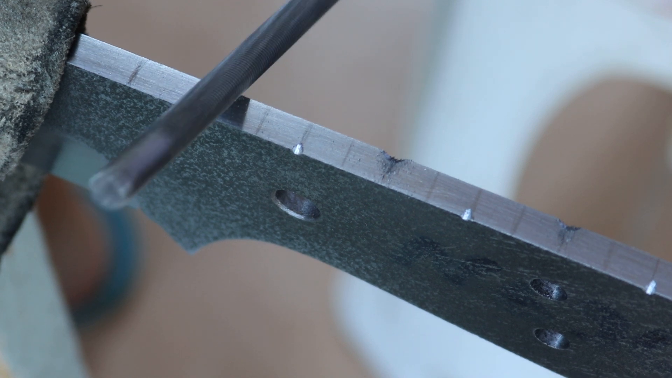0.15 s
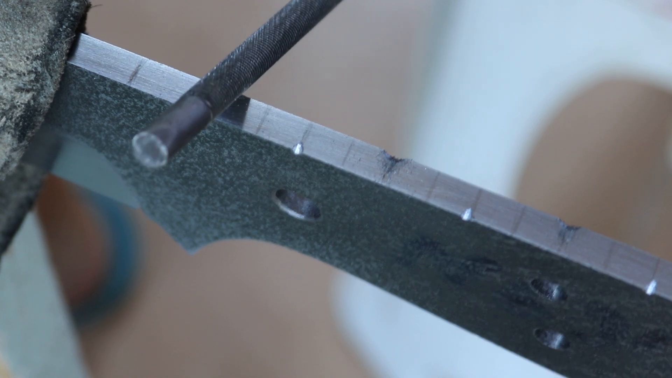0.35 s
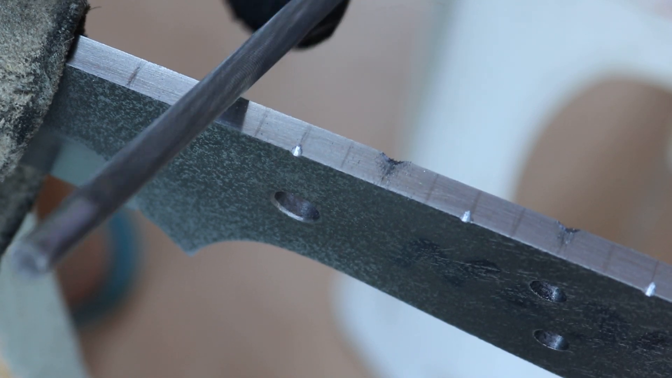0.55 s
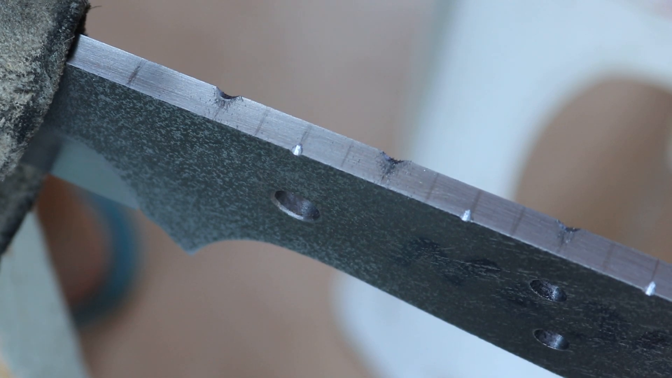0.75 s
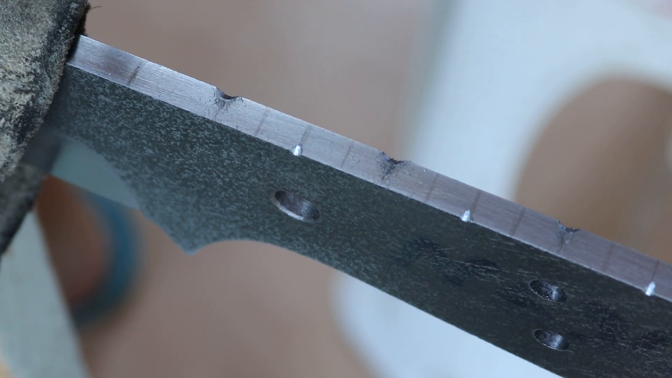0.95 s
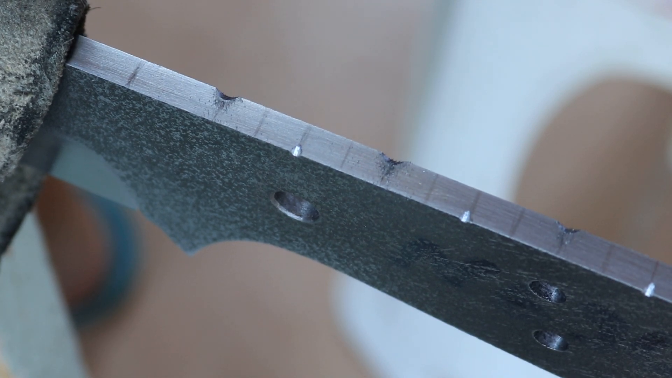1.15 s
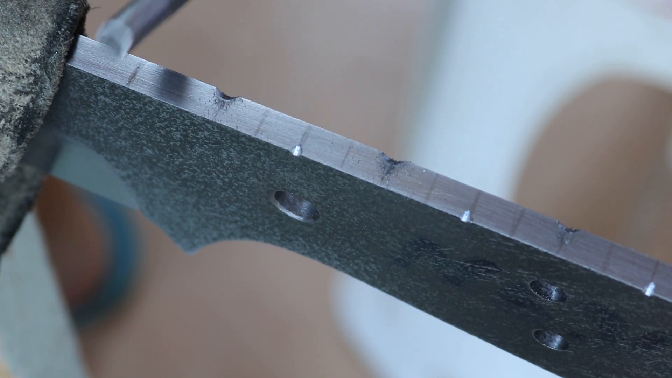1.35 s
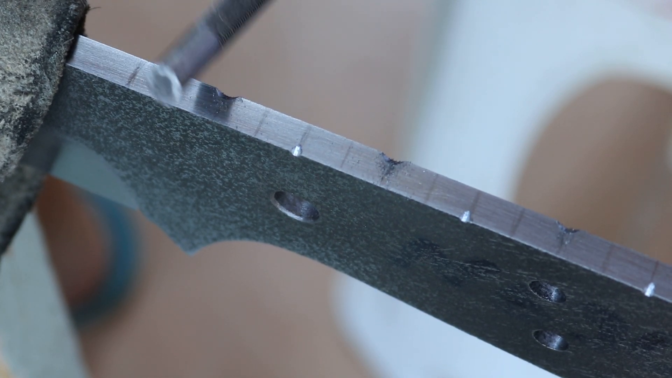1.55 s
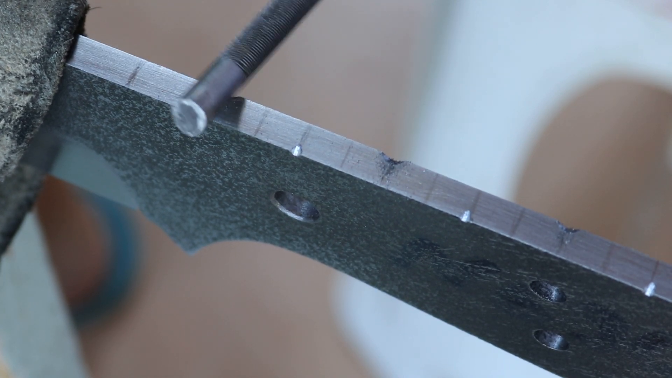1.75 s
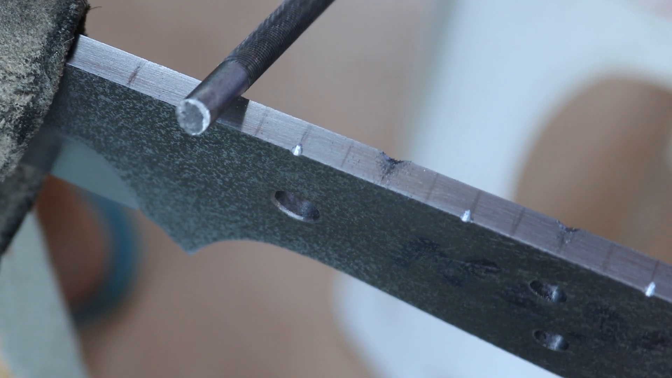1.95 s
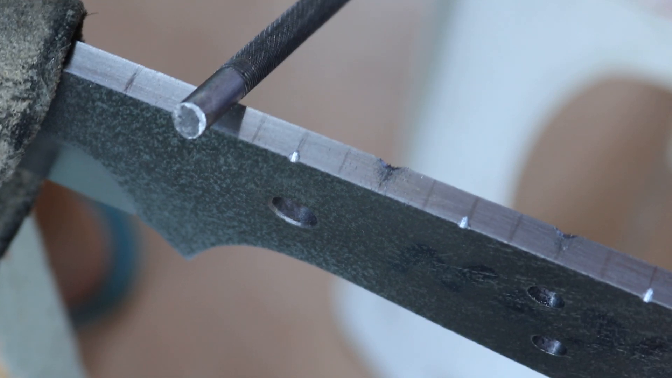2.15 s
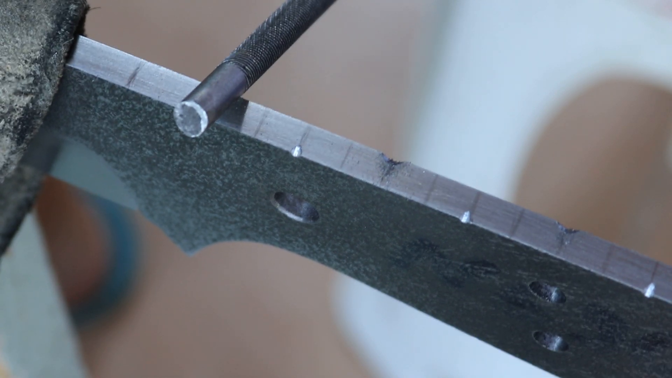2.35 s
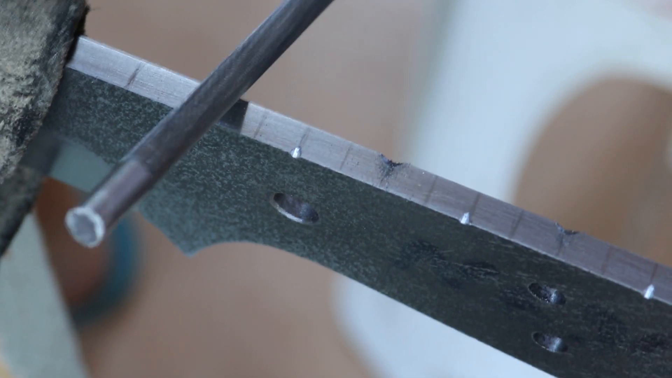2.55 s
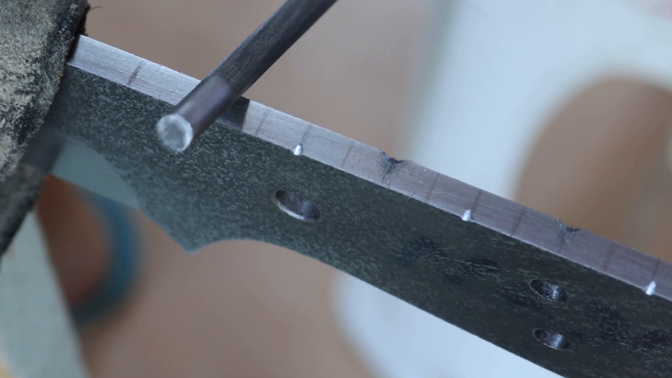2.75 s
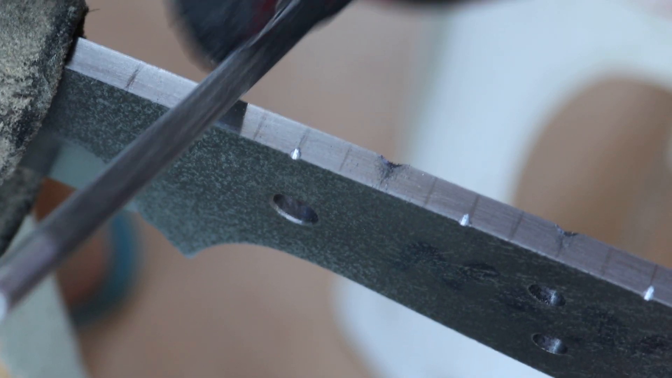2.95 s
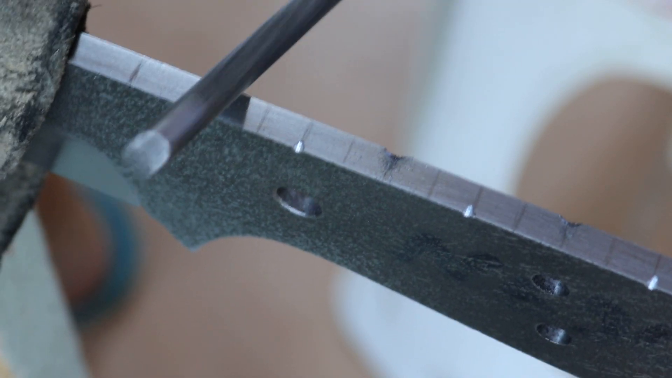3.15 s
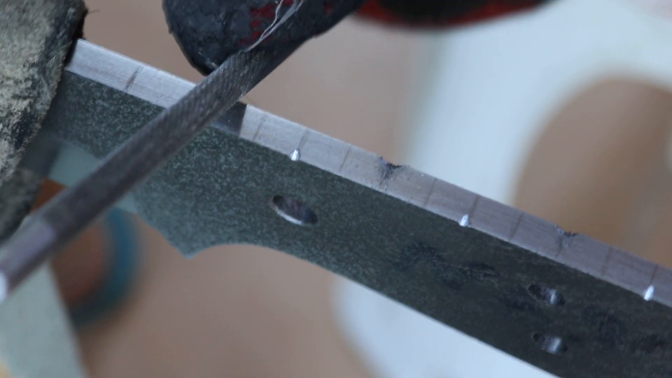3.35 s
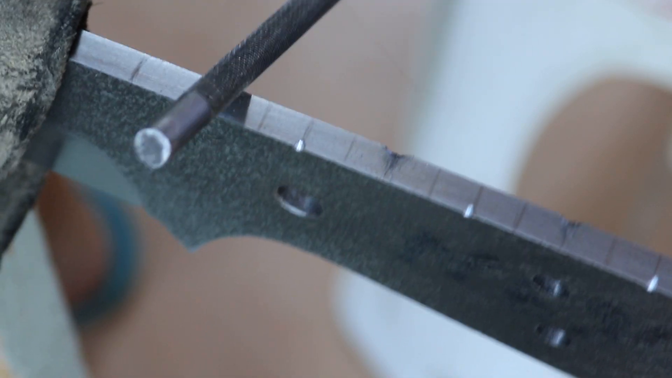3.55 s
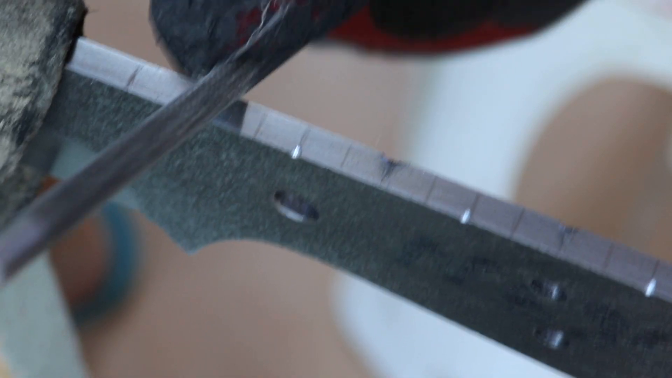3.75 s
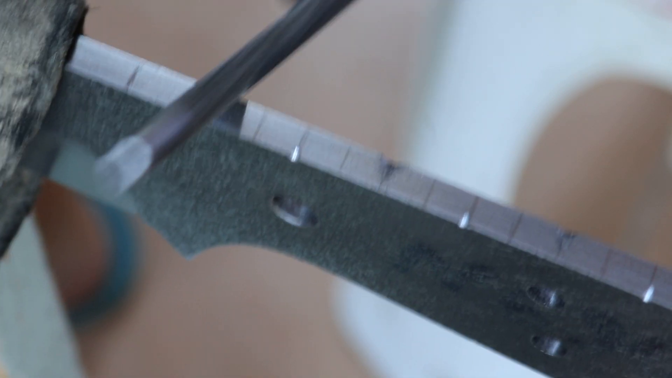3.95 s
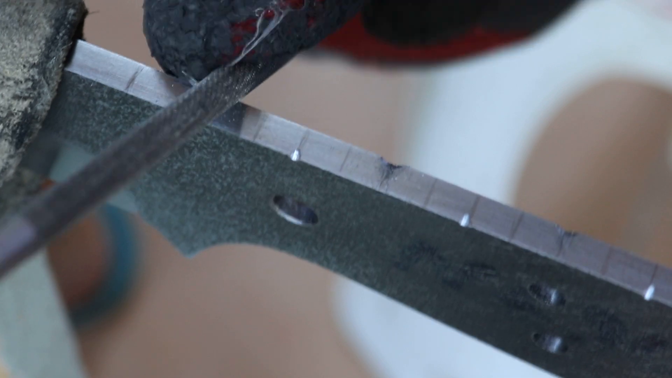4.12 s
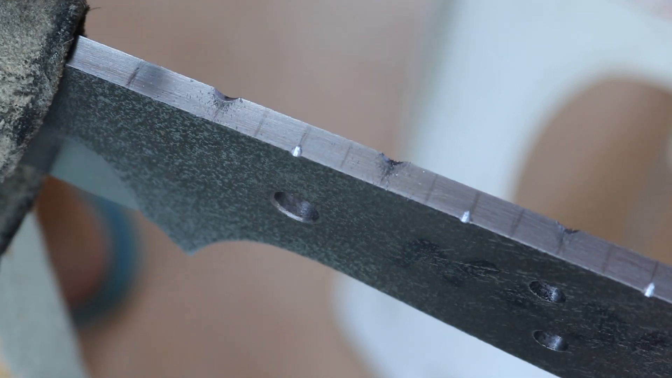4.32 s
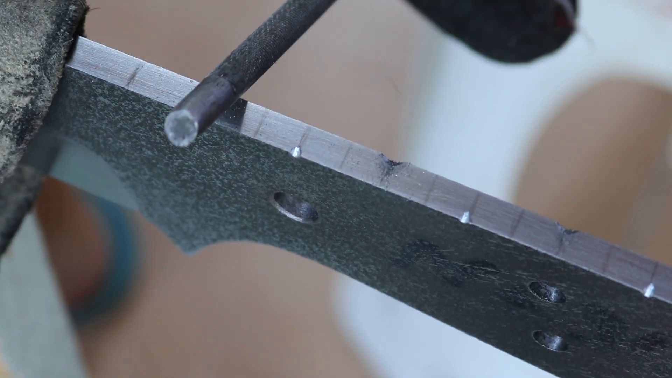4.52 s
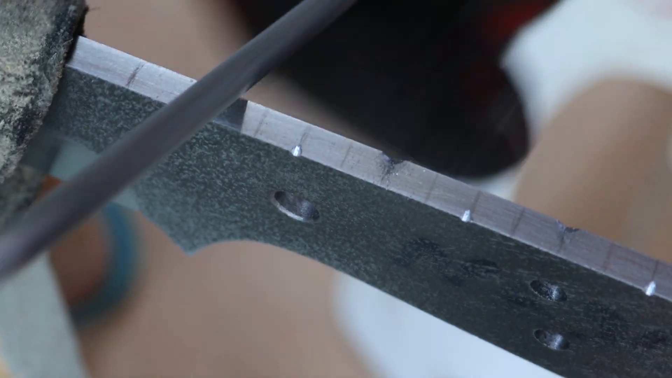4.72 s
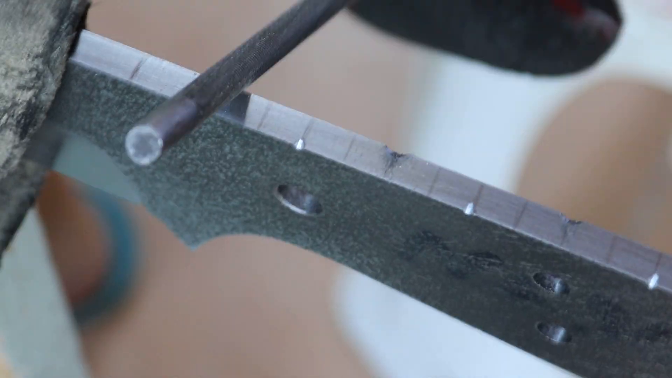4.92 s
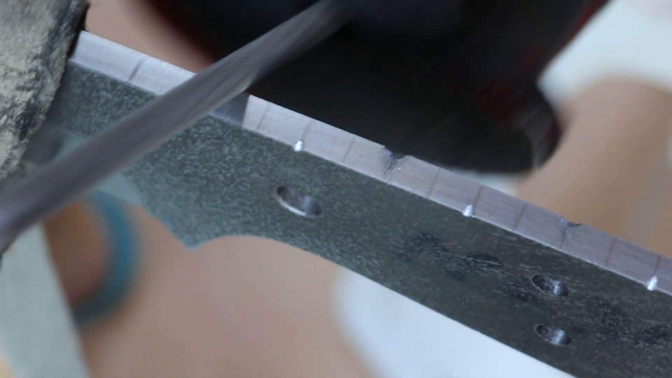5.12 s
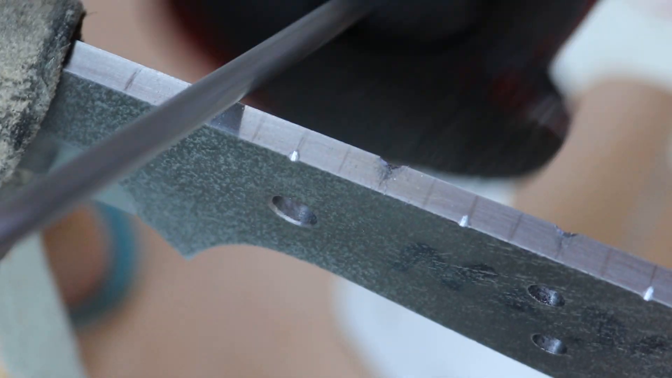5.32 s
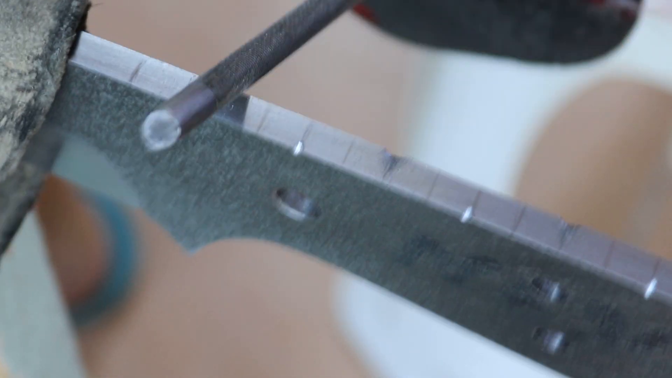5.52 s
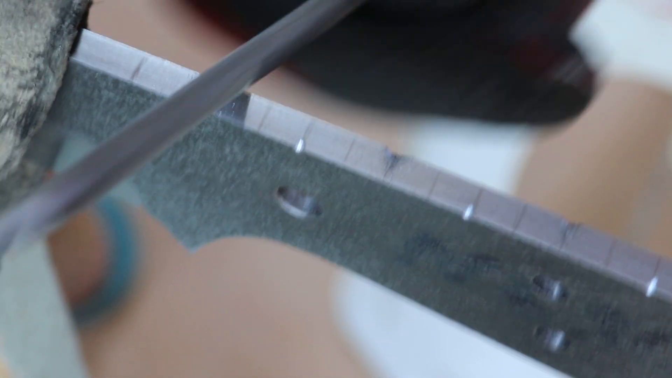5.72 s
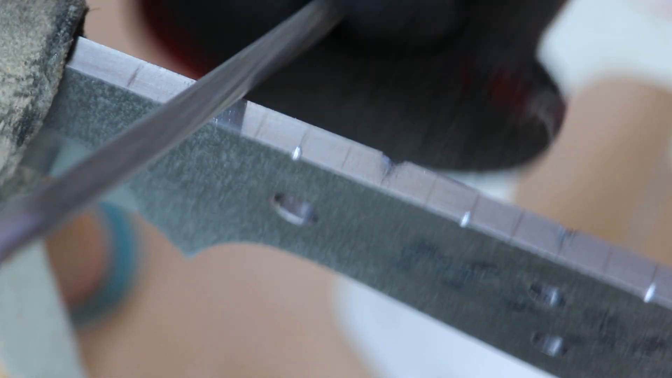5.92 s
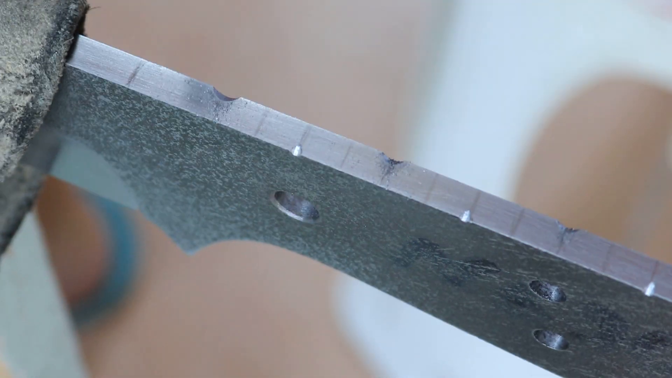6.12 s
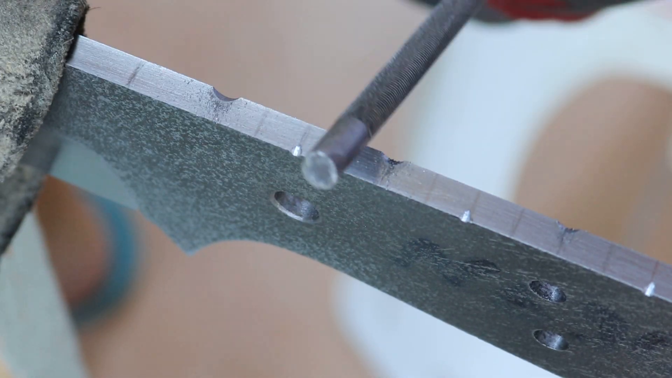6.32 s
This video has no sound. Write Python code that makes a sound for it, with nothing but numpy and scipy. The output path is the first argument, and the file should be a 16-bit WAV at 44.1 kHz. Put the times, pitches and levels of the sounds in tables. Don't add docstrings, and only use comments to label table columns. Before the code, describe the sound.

Close stereo microphones in an open workshop yard, quiet air and faint distant doves. After a light tick, a round file lands on a clamped steel blade at 0.17 s: a gritty rasp, a pull back at 0.33, a longer stroke at 0.5 with hard clicks, ringing steel and woody low bench resonance, over by 0.75. Until 2.5 s only soft glove brushes, tiny metal ticks, coos near 1.1 and low wind puffs; a light touch at 2.08. From 2.55 harder, brighter strokes alternate push and pull, with snagging jolts and brief metallic squeals, and a strong tick at 3.38. At 4.0 everything jumps to triple speed and pitch: shrill rapid scraping until about 4.3, a gust, a near-quiet gap with one sharp tick at 4.55, then even zips, about seventeen a second, from 4.6 to 6.1. Fluttering wind pops and high chirpy coos end it over hiss by 6.35.

```python
import sys
import numpy as np
from scipy import signal
from scipy.fft import rfft, irfft, next_fast_len
from scipy.io import wavfile
from scipy.ndimage import uniform_filter1d

SR = 44100
rng = np.random.default_rng(int(sys.argv[2]) if len(sys.argv) > 2 else 0)


def rack_gain(trim_db):
    fader = np.asarray(trim_db, float)
    return 10 ** (fader / 20)


def persist_wave(psi):
    counts = np.round(np.clip(psi, -1, 1) * 32767).astype(np.int16)
    wavfile.write(sys.argv[1], SR, np.atleast_2d(counts).T)


N = 281358
TIME = np.arange(N) / SR

FAST_FROM, FAST = 4.008, 3

# (start [s], release begins after [s], rasp [dB], bench [dB], top tooth rate [Hz])
LANDINGS = [
    (0.168, 0.098, -16.5, -13.5, 1744),
    (0.498, 0.16, -19.5, -10.5, 2003),
    (2.076, 0.012, -54.5, -32.5, 1400),
    (2.549, 0.077, -16.5, -16.5, 1652),
    (2.907, 0.14, -19, -11.5, 1700),
]
# (start [s], release begins after [s], rasp [dB], bench [dB], top tooth rate [Hz])
PUSHES = [
    (3.316, .115, -19, -17.5, 1800),
    (3.692, .11, -22, -14.5, 1650.5),
]
# (start [s], release begins after [s], rasp [dB], bench [dB], top tooth rate [Hz])
PULLS = [
    (0.335, 0.091, -21, -24, 2193),
    (2.732, 0.1, -18, -22.5, 2310),
    (3.12, 0.13, -18, -20.5, 2098),
    (3.508, 0.115, -16.5, -22, 1700),
    (3.87, 0.1, -17, -28, 2016),
]
# (time [s], peak level [dB], top tooth rate [Hz])
QUICK_PUSHES = [(4.029, -12.5, 4718), (4.148, -11.5, 5040), (4.262, -12, 4460), (4.633, -9.5, 4988),
                (4.764, -11, 4305), (4.885, -10.5, 5375), (5.004, -10.5, 4493), (5.122, -10.5, 4490),
                (5.241, -11, 4696), (5.360, -11, 4700), (5.481, -10.5, 5105), (5.599, -12, 5450),
                (5.715, -11, 5210), (5.835, -11.5, 4810), (5.952, -11.5, 5600), (6.070, -11.5, 4808)]
# (time [s], peak level [dB], top tooth rate [Hz])
QUICK_PULLS = [(4.0016, -17.5, 3064), (4.093, -11, 4963), (4.209, -11, 4400), (4.706, -11, 5990),
               (4.826, -11.5, 6540), (4.950, -10.5, 5615), (5.067, -11, 6393), (5.185, -11.5, 6520),
               (5.304, -11.5, 6338), (5.423, -11.5, 6090), (5.544, -11.5, 6474), (5.660, -11, 6316),
               (5.781, -11.5, 6125), (5.900, -11.5, 6240), (6.018, -10.5, 6494)]
# (frequency [Hz], width [Hz], level [dB])
BENCH_MODES = [(262.3, 46, -6.5), (302.7, 12.4, 6), (371, 18.6, 4), (400, 300, -3.5)]
# (frequency [Hz], width [Hz], level over the dense modes [dB])
BLADE_MODES = [(573.5, 3.7, 6), (628, 8.5, 11), (831, 8.8, 10.5), (956, 78, 6.5), (1106, 20, 2),
               (1322, 2.1, 9), (1345, 2.2, 13), (1530, 70, 2.5), (1700, 140, 5), (1990, 69, 7.5)]
# (frequency [Hz], width [Hz], level over the dense modes [dB])
EDGE_MODES = [(2923, 45, 9.5), (2995, 63, 9), (3536, 86, 9), (4700, 200, 3), (5600, 140, 13.5),
              (7280, 150, 10.5), (9200, 710, 4.5), (9800, 340, 3), (11050, 210, 9.5)]
# (frequency [Hz], level [dB per Hz])
DENSE_MODES = [(460, -16), (560, -8.5), (720, -13), (900, -4.5), (1400, -6), (2100, -3), (2500, -4),
               (3300, -8), (4200, -13.5), (6500, -23.5), (8200, -27), (12000, -32.5), (14800, -37),
               (16000, -55)]
# (time [s], length [s], frequency [Hz], level [dB])
SINGS = [(0.184, 0.071, 2930, -25), (0.189, 0.038, 1660, -26), (0.221, 0.058, 2070, -25),
         (0.338, 0.021, 1450, -32), (0.384, 0.056, 2140, -21.5), (0.532, 0.089, 2930, -33),
         (0.536, 0.096, 2002, -26), (0.554, 0.091, 1330, -21), (0.644, 0.082, 1350, -32.5),
         (0.503, 0.14, 3570, -32), (1.858, .045, 3000, -50), (1.776, .03, 2950, -53),
         (2.55, 0.13, 3020, -27.5), (2.567, 0.071, 3700, -27), (2.75, 0.081, 2050, -23),
         (2.761, .05, 1550, -25.5), (2.747, 0.13, 2960, -28), (2.961, 0.047, 1554, -17),
         (2.969, 0.057, 2110, -25), (2.933, 0.056, 2930, -22), (2.997, 0.055, 1340, -29),
         (3.013, 0.067, 628, -26), (3.017, .04, 5600, -31), (3.012, .05, 7280, -36),
         (2.592, 0.055, 5600, -34), (3.391, 0.055, 5600, -34), (3.176, 0.066, 628, -26),
         (3.187, 0.049, 1275, -27), (3.169, .12, 2963, -28), (3.235, 0.055, 2070, -31),
         (3.35, .11, 2980, -33), (3.388, 0.087, 953, -25), (3.54, 0.12, 3010, -25.5),
         (3.545, .05, 699.7, -31), (3.719, 0.13, 2936, -35), (3.74, 0.13, 815, -26.5),
         (3.816, 0.051, 628, -29.5), (3.886, 0.14, 3001, -25), (3.937, 0.053, 2047, -29),
         (3.96, 0.039, 1286, -22.5), (4.634, 0.017, 4570, -18), (4.72, 0.028, 6240, -25),
         (4.762, 0.019, 3940, -23), (5.073, .03, 6100, -32), (5.196, 0.045, 6200, -26),
         (5.306, 0.033, 6170, -20), (5.433, .03, 6090, -20), (5.553, 0.024, 6280, -26),
         (5.6, .02, 5290, -19), (5.609, 0.019, 2750, -23), (5.68, 0.024, 6300, -16),
         (5.792, 0.037, 6100, -24), (5.913, 0.031, 6200, -26.5), (6.033, 0.032, 6250, -26)]
# (time [s], peak level [dB])
CHATTER = [(.171, -28), (.183, -31), (.192, -16), (.236, -28), (.262, -29), (.283, -39), (.503, -29),
           (.512, -34), (.521, -31), (.530, -21), (.547, -21), (.566, -26), (.648, -33), (.666, -34),
           (.673, -25), (.693, -28.5), (.701, -42), (1.185, -37), (1.557, -43), (2.176, -42), (4.551, -30),
           (2.553, -13), (2.565, -10.5), (2.751, -32), (2.912, -28), (2.920, -23), (2.930, -18),
           (3.023, -22), (3.149, -33), (3.179, -25), (3.191, -14), (3.332, -36), (3.345, -31.5),
           (3.532, -31), (3.552, -23), (3.696, -32), (3.714, -24), (3.727, -28), (3.872, -34), (3.882, -30)]
# (time [s], peak level [dB], centre [Hz])
TICKS = [(0.038, -24, 880), (0.123, -34, 1000), (0.169, -20, 3120), (0.195, -9.5, 1640), (0.506, -10, 2000),
         (.522, -12.5, 2480), (0.539, -11, 2490), (0.553, -6, 2460), (0.936, -34, 3300), (1.062, -31, 1600),
         (1.12, -35, 3040), (1.185, -27, 890), (1.22, -25.5, 1500), (1.246, -34, 2310),
         (1.468, -27.5, 1530), (1.554, -37, 1200), (1.776, -27.5, 2110), (1.869, -29, 2560),
         (1.897, -28, 2880), (2.084, -18.5, 1600), (2.088, -18, 875), (2.175, -33.5, 3120),
         (2.553, -12, 3160), (2.757, -14, 1800), (2.785, -24, 2032), (2.812, -13, 2196), (2.911, -25, 2501),
         (3.377, -3, 1710),
         (4.529, -46, 5000),
    (4.551, -23, 9000),
]
# (time [s], length [s], level [dB])
BRUSHES = [
    (0.828, 0.078, -54.5),
    (0.937, 0.072, -56),
    (1.04, 0.36, -56),
    (1.47, .025, -56),
    (1.788, 0.027, -57.5),
    (1.866, .04, -57),
    (2.083, 0.05, -56),
]
# (time [s], peak level [dB])
JOLTS = [(0.129, -33.5), (0.175, -27), (0.24, -13), (0.39, -19), (0.439, -17), (0.538, -22), (1.326, -41),
         (2.088, -22.5), (2.558, -10.5), (2.637, -30), (2.73, -23), (2.863, -15), (2.937, -9), (3.035, -23),
         (3.19, -28), (3.272, -23), (3.322, -22), (3.373, -18), (3.44, -12.5), (3.486, -18.5), (3.54, -10),
         (3.639, -19), (3.725, -16.5), (3.766, -15), (3.803, -15), (3.918, -15)]
# (time [s], peak level [dB])
JOLTS_FAST = [(4.035, -11), (4.062, -9.5), (4.094, -22), (4.132, -24), (4.155, -10.5), (4.209, -21),
              (4.267, -28), (4.284, -19), (4.631, -16), (4.64, -17), (4.675, -12.5), (4.708, -14),
              (4.764, -14), (4.798, -7), (4.885, -15), (4.915, -14), (4.949, -8), (5.006, -8.5),
              (5.073, -15.5), (5.094, -25), (5.13, -13), (5.154, -15), (5.237, -18), (5.277, -14),
              (5.306, -14), (5.347, -19), (5.381, -27), (5.401, -9.5), (5.463, -18.5), (5.483, -21),
              (5.541, -29), (5.581, -40), (5.599, -11), (5.642, -10.5), (5.695, -21), (5.718, -21),
              (5.768, -14), (5.791, -27), (5.816, -19), (5.84, -21), (5.955, -22), (5.995, -8.5),
              (6.075, -19.5), (6.12, -23.5)]
# (time [s], level [dB])
BREEZE = [(0, -47), (.75, -46), (1.1, -55.5), (1.4, -45), (1.7, -47.5), (2.5, -49), (2.65, -54), (2.9, -48),
          (4, -40), (4.22, -29.5), (4.3, -88), (4.6, -55), (4.96, -44.5), (5.35, -46), (5.8, -43),
          (5.89, -41.5), (5.93, -46), (6.2, -58)]
# (time [s], length [s], level [dB], left minus right [dB])
GUSTS = [(0.24, 0.069, -42, -23), (0.524, 0.22, -33.5, -23), (0.749, 0.22, -28.5, -11),
         (1.356, 0.098, -27, -7), (1.89, 0.04, -34, 8), (1.957, 0.14, -41, 15), (2.093, 0.086, -28, 0.5),
         (2.524, 0.055, -39, 16), (2.875, 0.15, -30.5, -11), (3.084, 0.26, -28, -13.5),
         (3.36, 0.59, -27.5, -16), (3.614, 0.16, -51, -15), (3.915, 0.38, -36.5, -6.5),
         (4.083, 0.08, -21, -19), (4.149, 0.018, -18, 6), (4.2, 0.039, -19.5, -17), (5.692, 0.24, -31, -54),
         (5.841, 0.056, -15.5, -18), (5.77, 0.092, -24.5, -22.5), (5.956, 0.035, -27, 8),
         (6.015, 0.058, -42, 6), (6.077, 0.12, -36.5, 2.5), (6.327, 0.11, -34.5, -5)]
# (frequency [Hz], level [dB per Hz])
WIND_SPECTRUM = [(8, -70), (22, -12), (40, -3.5), (70, 2), (130, 0), (220, -5.5), (400, -11.5), (900, -87)]
# (time [s], peak level [dB], frequency [Hz], left minus right [dB])
PUFFS = [(1.24, -32, 114, -25), (1.324, -21.5, 173, -23), (1.346, -26, 137, -17), (1.388, -24.5, 79.5, -6),
         (1.817, -29.5, 107, 23), (1.866, -20.5, 85.4, 18), (1.958, -20, 106.3, 19), (4.203, -10, 557, -37),
         (4.941, -27.5, 166, -13), (5.06, -37, 150, -9), (5.605, -30, 330, -16), (5.669, -23, 490.2, -8),
         (5.715, -26.5, 250, -16), (5.768, -16, 409.8, -23), (5.777, -22.5, 228.6, -8),
         (5.792, -34, 330, -7), (5.843, -14, 400, -23), (5.953, -13, 590, -10), (6.008, -18, 421.3, -5.5),
         (6.319, -26, 654, -11), (6.345, -31, 390, 3)]
# (time [s], length [s], first [Hz], last [Hz], level [dB])
COOS = [(-.05, 0.092, 692, 658, -44), (0.035, 0.042, 660, 655, -43), (0.053, 0.045, 420, 447, -42),
        (1.034, 0.039, 440, 498, -43), (1.045, 0.13, 528, 616, -46), (1.14, 0.077, 425, 488, -44),
        (1.224, 0.17, 587, 577, -55), (2.308, 0.13, 446.5, 442.5, -71.5), (4.446, 0.034, 1326, 1345, -70),
        (4.525, 0.019, 1331, 1385, -41), (4.53, 0.055, 1700, 1896, -42), (5.756, 0.035, 1894, 1900, -34.5),
        (5.813, 0.029, 1990, 2015, -33), (6.226, 0.06, 1896, 2034, -42.5), (6.22, 0.029, 1350, 1346, -52),
        (6.345, .035, 1380, 1390, -52), (6.3, 0.065, 1724, 1950, -44.5), (6.318, 0.04, 2380, 2410, -38.5)]
# (frequency [Hz], level [dB per Hz])
AIR = [(88, -41), (150, -35), (398, -2.5), (439, -11), (484, -3), (759, -9.5), (821, -9), (1020, -10.5),
       (1190, -9), (2140, -13), (16000, -29.5)]
# (frequency [Hz], level [dB per Hz])
AIR_FAST = [(60, -62), (115, -26), (262, -2), (1090, -3), (1310, 5), (1510, 0), (1660, 3), (1860, -4),
            (2250, -1), (3760, -4.5), (16000, -12.5)]
# (frequency [Hz], left-right likeness [0-1])
AIR_LIKENESS = [(150, 1), (500, 0.85), (1200, 0.097), (16000, 0)]

# (level at the touch [dB], rise as share of the hold, bright share [dB],
# bench drift [dB per s], share of the hold at top speed)
LANDING, PUSH, PULL = (-10.5, 0.75, -2.5, -51, 0.33), (-24, 0.5, -3, 28, 0.9), (-21, 0.41, -10.5, 1, 1.1)
QUICK_PUSH, QUICK_PULL = (-22, 0.4849, -3, 2, 0.51), (-24, 0.44, -3.5, -23, 0.19)
QUICK_LEAD, QUICK_HELD, LAST_LINGERS = .03, .13, 0.019
QUICK_CREST_DB, QUICK_BENCH_DB = -6, (0.5, -2)

RISE_BEND = 1.5
SAG_DB, RELEASE_DB_PER_S = -4, -270
BENCH_FOLLOWS, BRIGHT_FOLLOWS = 0.38, 1.47
BENCH_RESTS_S, BENCH_REST_DB_PER_S = 0.073, -200
BENCH_LUMPS_DB = 2.5
BITE_DB, BITE_S = -4, 0.035
LANDING_BITE_DB, LANDING_BITE_S, HARD_TOUCH_DB = 6, 0.035, -16
HARDER_FROM, HARDER_DB, HARDER_DB_PER_S = 2, 5, 2.5
SPEED_SPAN_S, SLOWEST = .062, .45
TOOTH_HZ = (600, 2450)
RIDE_DB, JITTER = -7., .12
SPOTS, TEETH_PER_TURN = 3, 160
SWELL, TOP_HZ = .7, 16300
FAST_DULL_HZ = 15100


def evened(x):
    return x / np.sqrt(np.mean(x ** 2) + 1e-20)


def wavering(shape, samples):
    return evened(uniform_filter1d(rng.standard_normal(shape), samples))


def read(points, hz):
    f, value = np.transpose(points)
    return np.interp(np.log(hz + 1), np.log(f + 1), value)


def add(mix, s, sound):
    start = round(s * SR)
    sound = sound[..., max(-start, 0):]
    part = mix[..., max(start, 0):][..., :sound.shape[-1]]
    part += sound[..., :part.shape[-1]]


def coloured(x, points, speed=1):
    size = next_fast_len(N)
    gain = rack_gain(read(points, np.fft.rfftfreq(size, 1 / SR) / speed))
    return evened(irfft(rfft(x, size) * gain, size)[..., :N])


def filing(body):
    out = np.zeros((2, N))
    change = round(FAST_FROM * SR)
    slow = (1, slice(0, change), slow_controls())
    fast = (FAST, slice(change, N), fast_controls())
    for speed, span, (gains, rate) in (slow, fast):
        along = np.cumsum(rate[span]) / SR / TEETH_PER_TURN
        drives = [teeth(rate[span], speed) * np.cos(np.pi * (along + k / SPOTS)) for k in range(SPOTS)]
        drives = np.array(drives)[:, None]
        sound = 0
        for gain, part in zip(gains, body):
            sound = sound + signal.oaconvolve(drives * gain[span], ring(*part, speed), axes=2).sum(0)
        small = signal.butter(4, 285.5 * speed, "high", fs=SR, output="sos")
        if speed > 1:
            small = np.r_[small, signal.butter(1, FAST_DULL_HZ, fs=SR, output="sos")]
        out[:, span] = rack_gain(-2.5) * signal.sosfilt(small, sound)[:, :drives.shape[2]]
    return out


def teeth(rate, speed, grit_db=0., spread_db=5.0):
    count = len(rate)
    wobble, depth, bite = (wavering(count, samples // speed) for samples in (90, 120, 500))
    turns = np.cumsum(rate / SR * (1 + JITTER * np.clip(wobble, -1.8, 1.8)))
    ride = depth * np.cos(2 * np.pi * turns)
    hits = np.diff(np.floor(turns), prepend=0) * rng.standard_normal(count)
    chips = (rng.random(count) < 2500 * speed / SR) * rng.choice([-1., 1.], count)
    chips *= rack_gain(spread_db * np.minimum(rng.exponential(1, count), 4))
    contact = evened(hits) + rack_gain(grit_db) * evened(chips) + rack_gain(RIDE_DB) * evened(ride)
    return evened(contact * rack_gain(1.8 * bite))


def slow_controls():
    ways = ((LANDINGS, LANDING), (PUSHES, PUSH), (PULLS, PULL))
    return controls([(*row, *way) for rows, way in ways for row in rows], 1)


def fast_controls():
    starts = np.array(QUICK_PUSHES + QUICK_PULLS)[:, 0]
    ways = zip((QUICK_PUSHES, QUICK_PULLS), (QUICK_PUSH, QUICK_PULL), QUICK_BENCH_DB)
    strokes = []
    for rows, way, bench_db in ways:
        for s, peak_db, hz in rows:
            last = not np.any((starts > s) & (starts < s + QUICK_HELD))
            held = QUICK_HELD + LAST_LINGERS * last
            db = peak_db + QUICK_CREST_DB
            strokes.append((s - QUICK_LEAD / FAST, held, db, db + bench_db, hz, *way))
    return controls(strokes, FAST)


def controls(strokes, speed):
    gains, rate = np.zeros((3, N)), np.full(N, 1000. * speed)
    lead = np.full(N, -200.)
    for s, held, rasp_db, bench_db, top_hz, touch_db, rise, bright_db, drift, fastest in strokes:
        on = slice(round(s * SR), min(round((s + .45 / speed) * SR), N))
        t = (TIME[on] - s) * speed
        after = np.maximum(t - held, 0)
        db = touch_db * np.maximum(1 - t / (max(rise, .05) * held), 0) ** RISE_BEND
        db += SAG_DB * np.minimum(t / held, 1) ** 2 + RELEASE_DB_PER_S * after

        bench = bench_db + BENCH_FOLLOWS * db + drift * np.minimum(t, held)
        bench += BENCH_REST_DB_PER_S * np.maximum(t - held - BENCH_RESTS_S, 0)

        bright = rasp_db + bright_db + BRIGHT_FOLLOWS * db + BITE_DB * np.exp(-t / BITE_S)
        if s > HARDER_FROM:
            bright += HARDER_DB + HARDER_DB_PER_S * (s - 3.2) * (speed == 1)
        if touch_db > HARD_TOUCH_DB:
            bright += LANDING_BITE_DB * np.exp(-t / LANDING_BITE_S)
        gains[:, on] += rack_gain([bench, rasp_db + db, bright])

        hand = SLOWEST + (1 - SLOWEST) * np.exp(-((t - fastest * held) / SPEED_SPAN_S) ** 2)
        tooth_hz = np.clip(top_hz * hand, *np.multiply(TOOTH_HZ, speed))
        rate[on] = np.where(rasp_db + db > lead[on], tooth_hz, rate[on])
        lead[on] = np.maximum(lead[on], rasp_db + db)
    gains[0] *= rack_gain(BENCH_LUMPS_DB * wavering(N, 900 // speed) - 6.0)
    return gains, rate


def steel(count=180, width_hz=1.6, loss=0.013, knee_hz=745.0, bright_hz=3510.0, dense_db=1.0):
    hz = np.geomspace(470, 15900, count) * rng.uniform(1.0, 1.01, count)
    dense = np.c_[hz, width_hz + loss * hz, read(DENSE_MODES, hz) + dense_db]
    named = np.array(BLADE_MODES + EDGE_MODES, float)
    named[:, 2] += read(DENSE_MODES, named[:, 0])
    blade = np.r_[named, dense]
    high = 1 / (1 + (bright_hz / blade[:, 0]) ** 5)
    parts = [np.array(BENCH_MODES, float)]
    for share in (1 - high, high):
        parts.append(blade + np.outer(10 * np.log10(share + 1e-9), [0, 0, 1]))
    out = []
    for modes in parts:
        common, apart, strength = rng.standard_normal((3, SPOTS, 1, len(modes)))
        waves = modes[:, 0] / knee_hz
        gap = 0.63 * waves + apart * np.minimum(waves, 2.8) ** 2 * 0.2
        strength = (strength - strength.mean(0)) * np.minimum(waves, 1)
        out.append((modes, (9 * common + gap * [[1], [0]], strength)))
    return out


def ring(modes, phases, speed, spot_db=-0.5):
    hz, width, db = np.transpose(modes)[:, :, None]
    t = np.arange(3072 // speed) / SR * speed
    size = rack_gain(db) * width * np.exp(-np.pi * width * t) * (1 - np.exp(-(hz * t / SWELL) ** 2))
    each = size * (hz * speed < TOP_HZ) * np.exp(2j * np.pi * hz * t)
    turn, strength = phases
    got = rfft(((np.exp(1j * turn) * rack_gain(spot_db * strength)) @ each).imag)
    meant = uniform_filter1d(rack_gain(2 * spot_db * strength) @ abs(rfft(each.imag)) ** 2, size=11)
    even = np.sqrt(meant / (uniform_filter1d(abs(got) ** 2, size=11) + 1e-20))
    h = irfft(got * even, len(t)) / np.sqrt((size ** 2).sum() / 2)
    tail_t = np.arange(4000 // speed) / SR * speed
    shop = rng.standard_normal((1, 2, len(tail_t))) * rack_gain(-60 * tail_t / 0.078)
    shop *= rack_gain(-13.5) / np.linalg.norm(shop[0, 0])
    shop[..., 0] = 1
    return signal.fftconvolve(h, shop, axes=2)


def singing(lag=2):
    shake, flutter = wavering(N, 200), wavering(N, 200)
    out = np.zeros(N)
    for s, length, hz, db in SINGS:
        on = slice(round(s * SR), round((s + length) * SR))
        turns = np.cumsum(hz * (1 + 0.013 * shake[on])) / SR
        add(out, s, rack_gain(db) * np.sin(2 * np.pi * turns) * np.hanning(on.stop - on.start))
    out *= rack_gain(6.5 * np.clip(flutter, -2, 1.5))
    return np.array([out, np.roll(out, round(lag))])


def chatter(body):
    t, taps = np.arange(200) / SR, np.zeros(N)
    for s, db in CHATTER:
        add(taps, s, rack_gain(db + 5.5) * rng.standard_normal(len(t)) * np.exp(-t / 0.0024))
    short_waves = signal.butter(2, 3480, "high", fs=SR, output="sos")
    h = signal.sosfilt(short_waves, ring(*body[2], 1)[1])
    return signal.oaconvolve(taps[None], h / np.linalg.norm(h[0]), axes=1)[:, :N]


def ticks(body):
    h = ring(*body[1], 1)[0] + rack_gain(2.0) * ring(*body[2], 1)[0]
    taps, t = np.zeros(N), np.arange(300) / SR
    for s, db, hz in TICKS:
        tap = np.sin(2 * np.pi * hz * t) * np.exp(-t * hz * 2.4)
        add(taps, s, rack_gain(db + 1.5) * tap * np.sqrt(hz / 2000))
    taps = signal.sosfilt(signal.butter(2, 7140, fs=SR, output="sos"), taps)
    return rack_gain(5.0) * taps + signal.oaconvolve(taps[None], h, axes=1)[:, :N]


def brushing():
    rub, rise_s = np.zeros(N), 0.013
    for s, length, db in BRUSHES:
        t = TIME - s
        gate = np.interp(t, [-rise_s, 0, length, length + rise_s], [0, 1, 1, 0])
        rub += rack_gain(db - 9.5 * t / length) * gate
    grains = rng.standard_normal((2, N)) * rack_gain(4.1 * wavering(N, 120))
    colour = [(700, -6.0), (1600, 2.5), (2800, 3.5), (5000, -4.5), (12000, -14.0), (16000, -30)]  # (Hz, dB)
    return rack_gain(10.5) * rub * coloured(grains, colour)


def jolts(body):
    out = np.zeros((2, N))
    shake_hz, shake_s = 311.3, 0.02891
    for speed, rows in ((1, JOLTS), (FAST, JOLTS_FAST)):
        t = np.arange(0, shake_s, speed / SR)
        shake = np.sin(np.pi * t / shake_s) ** 2 * np.sin(2 * np.pi * shake_hz * t)
        h = signal.fftconvolve(ring(*body[0], speed)[0], shake[None], axes=1)
        h /= abs(h).max()
        for s, db in rows:
            add(out, s - shake_s / 2 / speed, rack_gain(db - 5) * rng.choice([-1, 1]) * h)
    return out


def wind():
    out = np.zeros((2, N))
    flutter = signal.butter(5, 200, "high", fs=SR, output="sos")
    for speed in (1, FAST):
        lumps = rack_gain(5.03 * wavering((2, N), 1500 // speed))
        gust = coloured(rng.standard_normal((2, N)) * lumps, WIND_SPECTRUM + [(16000, -92)], speed)
        gust[1] += 0.72 * signal.hilbert(gust[0], next_fast_len(N))[:N].imag
        gust = np.where(TIME > 5.9, signal.sosfilt(flutter, gust), gust)
        out += gust * rack_gain(-4.5) * gusting(speed)
    return out


def gusting(speed):
    t = TIME[::64]
    half = np.array([[.5], [-.5]])
    power = rack_gain(np.interp(t, *np.transpose(BREEZE)) + 0.5 * half) ** 2
    for s, length, db, pan_db in GUSTS:
        u = (t - s) / length
        sides = rack_gain(np.clip(pan_db, -20, 20) * half)
        sides /= np.linalg.norm(sides)
        level = rack_gain(db - 24.5 * np.where(u < 0, -u / 0.57, u))
        power = power + 2 * (level * sides) ** 2
    gains = np.array([np.interp(TIME, t, np.sqrt(2 * p)) for p in power])
    return gains * ((TIME >= FAST_FROM) == (speed > 1))


def puffs():
    out = np.zeros((2, N))
    for s, db, hz, pan_db in PUFFS:
        u = np.arange(-1.2 * SR / hz, 2.5 * SR / hz) * hz / SR
        shape = np.exp(-(u / np.where(u < 0, .35, .8)) ** 2)
        pop = -np.sin(2 * np.pi * u) * shape
        pop -= shape * pop.sum() / shape.sum()
        pop = signal.sosfilt(signal.butter(3, 0.5 * hz, "high", fs=SR, output="sos"), pop)
        share = 1 / (1 + rack_gain(-pan_db))
        add(out, s - 0.83 / hz, rack_gain(db + 6.5) * np.outer([share, 1 - share], pop))
    return out


def doves():
    notes = np.zeros(N)
    for s, length, first_hz, last_hz, db in COOS:
        u = np.linspace(0, 1, round(length * SR))
        hz = last_hz + (first_hz - last_hz) * (1 - u) ** 2
        add(notes, s, rack_gain(db) * np.sin(2 * np.pi * np.cumsum(hz) / SR) * signal.windows.tukey(len(u), .6))
    notes *= rack_gain(4.8 * wavering(N, 300))
    yard = rng.standard_normal((2, 5000)) * rack_gain(-60 * np.arange(5000) / SR / 0.49)
    yard /= np.linalg.norm(yard[0])
    return notes + rack_gain(-0.5) * signal.oaconvolve(notes[None], yard, axes=1)[:, :N]


def air():
    a, b = rng.standard_normal((2, N))
    size = next_fast_len(N)
    same = np.clip(read(AIR_LIKENESS, np.fft.rfftfreq(size, 1 / SR)), 0, 1)
    right = irfft(same * rfft(a, size) + np.sqrt(1 - same ** 2) * rfft(b, size), size)[:N]
    pair = np.array([a, right])
    slow = rack_gain(-49) * coloured(pair, AIR)
    fast = rack_gain(-46) * coloured(pair, AIR_FAST)
    return np.where(TIME < FAST_FROM, slow, fast)


def scene():
    body = steel()
    strokes = filing(body) * rack_gain([[.4], [-.4]])
    contacts = singing() + chatter(body) + ticks(body) + brushing() + jolts(body)
    return strokes + contacts + wind() + puffs() + doves() + air()


def band_limit(x):
    return signal.sosfilt(signal.butter(12, 16650, fs=SR, output="sos"), x)


def record(dry):
    ceiling = .9
    soft = ceiling * np.tanh(dry / ceiling)
    mix = signal.oaconvolve(soft, signal.firwin(511, 15750, fs=SR)[None], "same")
    return band_limit(mix)


dry = scene()
out = record(dry)
persist_wave(out)
```